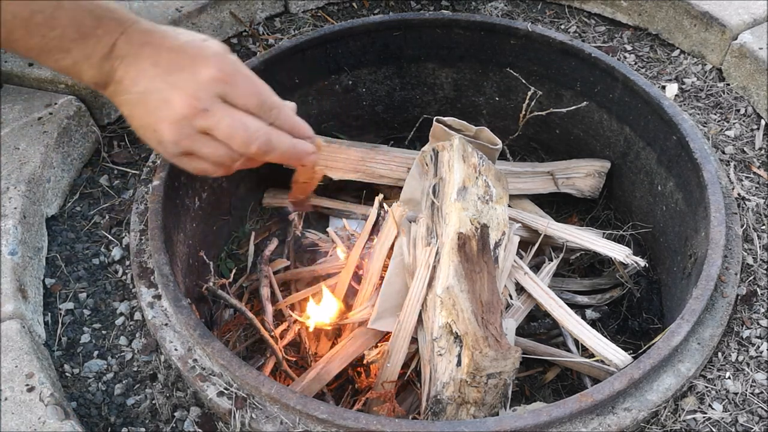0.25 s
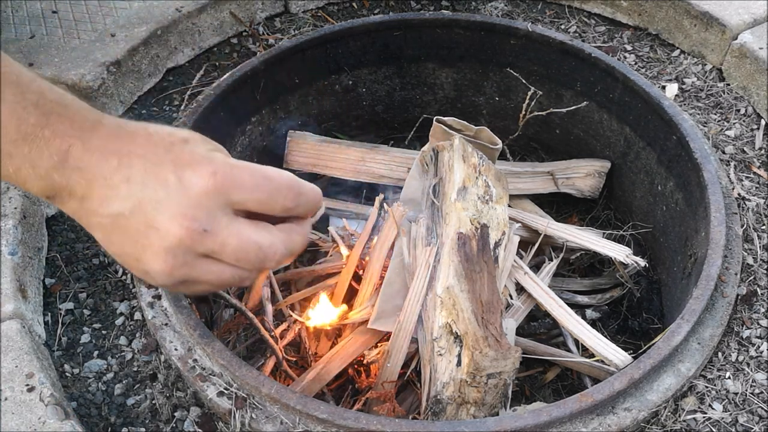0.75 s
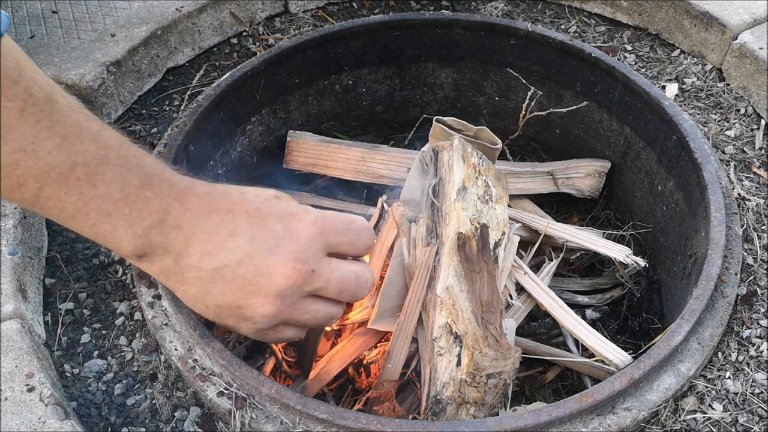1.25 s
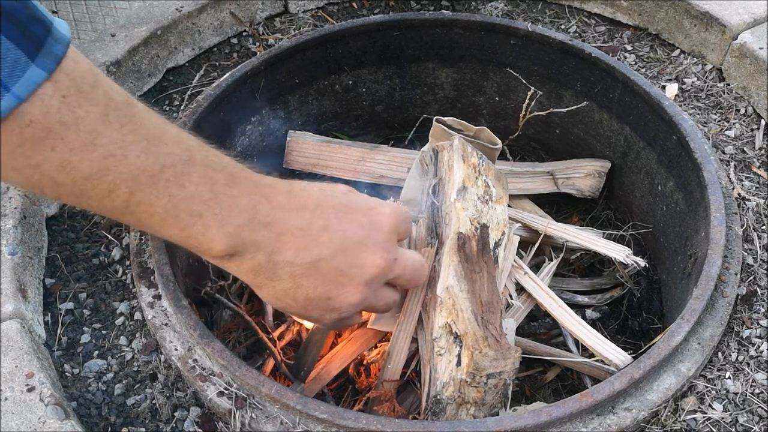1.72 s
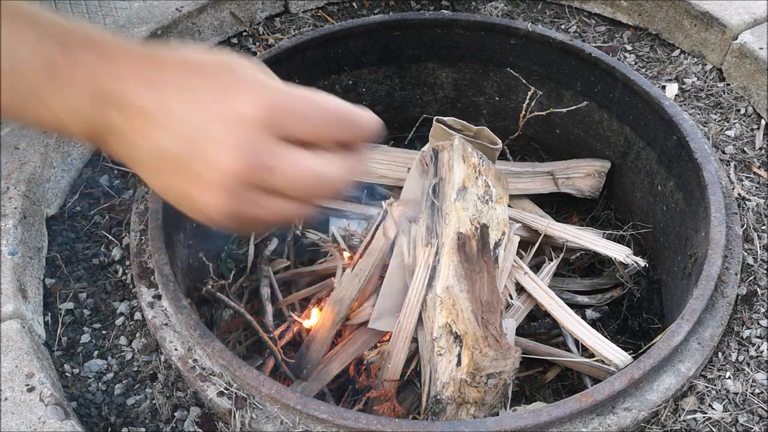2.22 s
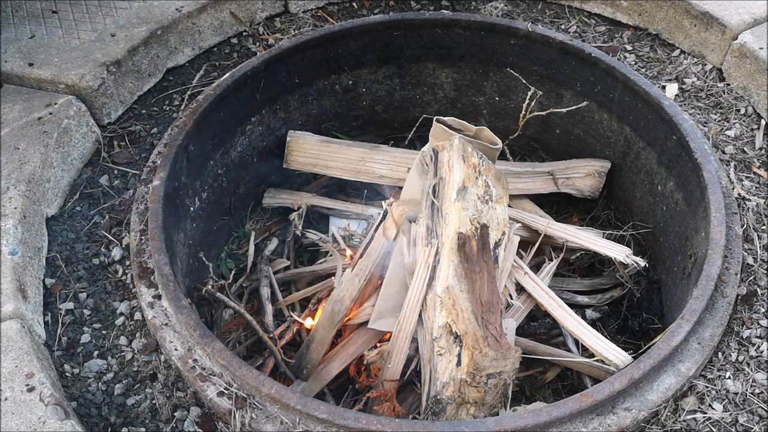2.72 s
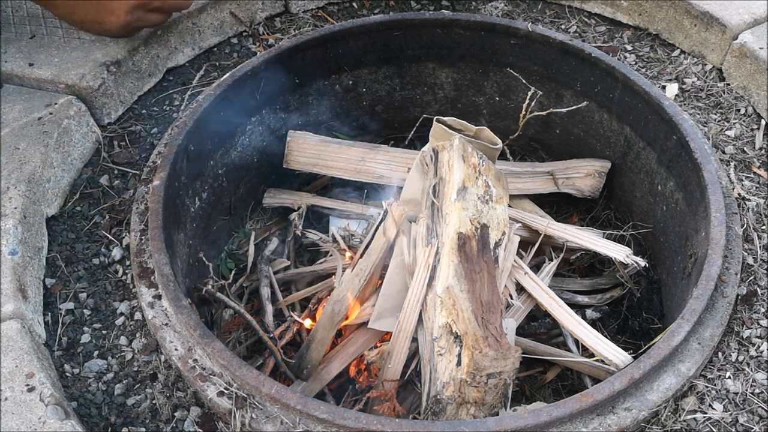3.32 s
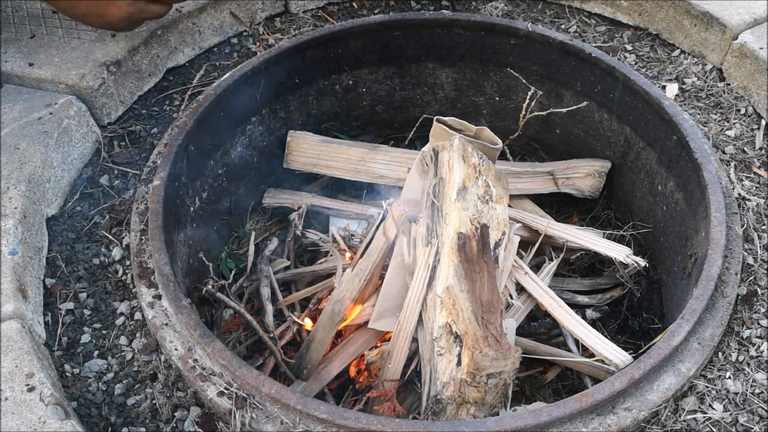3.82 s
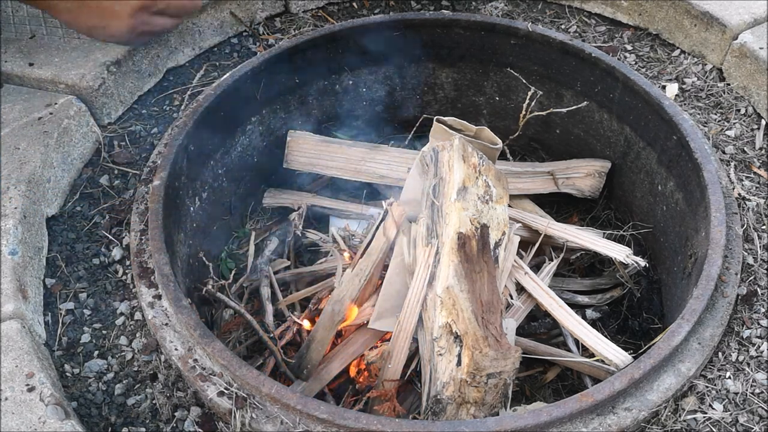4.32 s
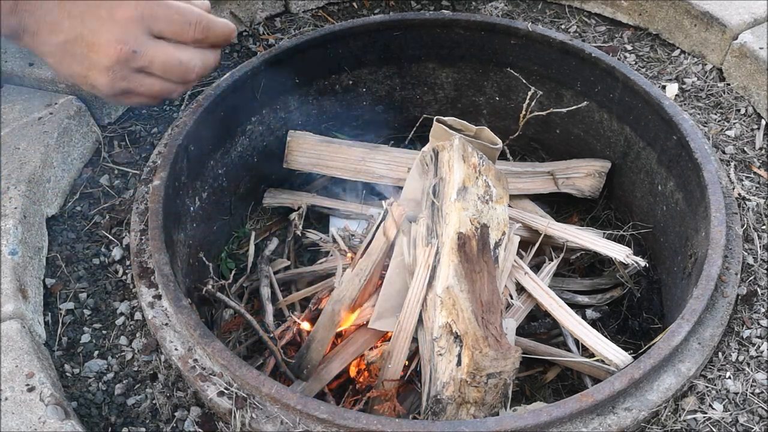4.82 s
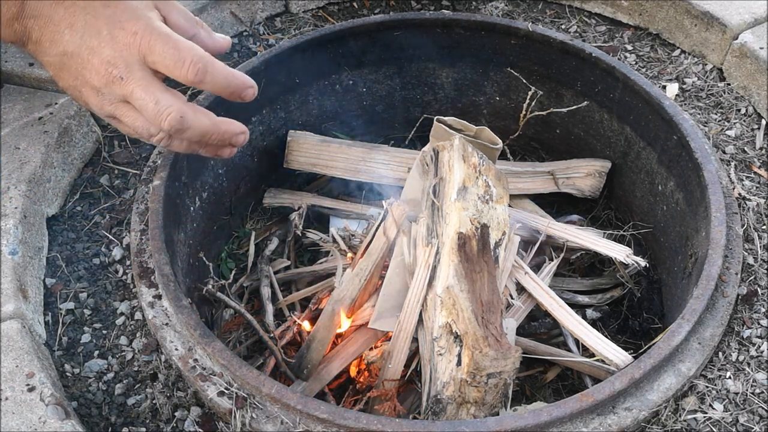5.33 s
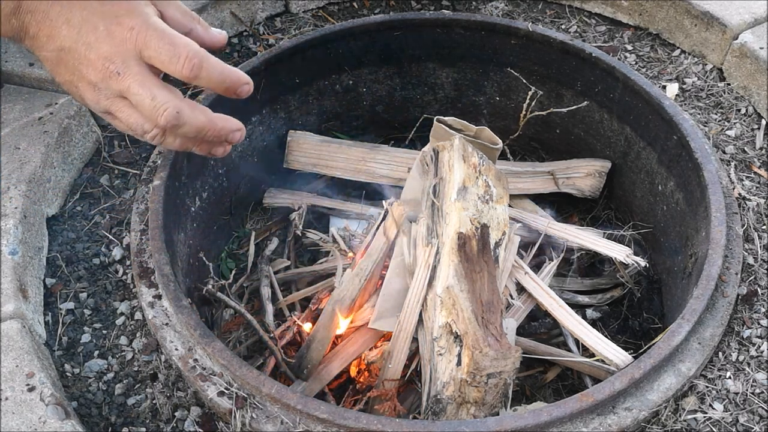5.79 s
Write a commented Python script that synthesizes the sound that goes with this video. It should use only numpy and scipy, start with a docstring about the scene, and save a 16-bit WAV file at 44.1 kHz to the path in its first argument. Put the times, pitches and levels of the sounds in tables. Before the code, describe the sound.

A hand-held phone close to a small outdoor wood fire, in quiet air with faint low wind. From 0 to 0.3 s fingers rustle dry bark and tinder, with soft thuds, tiny wood scrapes and a high, quick bird twitter at the right. Sharp, dry pops gather from 0.5 s and come thickly between 0.75 and 2.2 s over a fine ticking sizzle. Bird notes return at 1.2-1.75 s, then a strong, falling buzzy call at 1.8 s. Rustling and bumps swell again at 1.75-2.1 s. After a lull, snaps cluster around 3-3.8 s with wind puffs. Crackling thins from 4 s; a softer buzz sounds at 4.4 s. Slurred whistles and a clear chip at 4.9-5.2 s lead into sparse chips, short buzzes and isolated pops until 6 s. Faint nasal bird calls come occasionally from afar, echoing in the trees.

```python
"""Kindling and birdsong

Freshly lit kindling pops and ticks in a steel fire ring at a wooded campground: noise bursts, clicks and ringing sticks.
A hand tucks tinder into the pile, as swelling showers of clicks. Small birds twitter, buzz and whistle on gliding
tones, a nasal call made of overtones comes from far off, and decaying noise tails give the trees' echoes.
Filtered noise gives the outdoor air and the rumble on a hand-held phone, whose two ports colour sound differently."""
import sys
import numpy as np
from scipy import signal
from scipy.fft import rfft, irfft
from scipy.io import wavfile
from scipy.ndimage import uniform_filter1d

SR = 44100
rng = np.random.default_rng(int(sys.argv[2]) if len(sys.argv) > 2 else 0)


def digitize_waveform(pressure):
    """Quantize a signal to 16-bit integers and store it at the path in sys.argv[1].

    Rows of a 2-D input are taken as channels; values are limited to [-1, 1].
    """
    field = np.atleast_2d(pressure).T
    bounded = np.clip(field, -1, 1)
    quanta = np.round(bounded * 32767).astype(np.int16)
    wavfile.write(sys.argv[1], SR, quanta)


N = 267113
TIME = np.arange(N) / SR

# Colour of the left and right microphone ports. Each row: frequency in Hz, gain in dB.
LEFT_PORT_COLOUR = [(300, -24), (800, -36.5), (1050, -26), (1400, -34), (1800, -22.5), (2900, -12.5),
                    (4100, -6), (5150, 0), (6100, -13), (7200, -21), (8400, -17), (10700, -26),
                    (12500, -21), (15000, -37)]
RIGHT_PORT_COLOUR = [(300, -24), (800, -16), (1050, -25), (1400, -17), (1800, -11.5), (2900, -10.5),
                     (4100, -10), (5150, -5.5), (6100, -4.5), (7200, 6.5), (8400, -12.5), (10300, -14),
                     (12200, -7), (15000, -19.5)]
# Spectrum of the outdoor air common to both ports, then of the part with opposite sign at each.
# Each row: frequency in Hz, relative density in dB per Hz.
AIR_MID_SPECTRUM = [(26, -13), (45, -1.5), (100, -6), (170, -11.5), (290, -15.5), (430, -31), (800, -32.5),
                    (1070, -28.5), (1400, -30.5), (1840, -27), (4300, -32.5), (5400, -23), (6300, -34.5),
                    (7200, -29.5), (8240, -43), (16000, -46.5)]
AIR_SIDE_SPECTRUM = [(30, -2.5), (60, -4), (256, -5), (500, -13), (842, -14.5), (2090, -13.5), (2300, -9),
                     (3500, -18.5), (4860, -9.5), (5860, -13), (6280, -9), (7230, -21.5), (8710, -27.5),
                     (16000, -31)]
# rms levels of the two parts before the slow swell (dB)
AIR_MID_DB, AIR_SIDE_DB = -62.5, -68
# Puffs of wind on the phone. Each row: start in seconds, length in seconds, peak gain in dB.
WIND_PUFFS = [(.15, .22, -62), (.62, .08, -64), (2.02, .08, -57), (2.72, .08, -57), (3.08, .1, -51),
              (3.3, .16, -61), (4.6, .17, -50), (4.97, .2, -56), (5.5, .2, -58)]
BREEZE_DB = -64  # gain of the steady rumble beneath the puffs
# Strokes of the hand over bark and tinder.
# Each row: start in seconds, length in seconds, peak gain in dB on the port-coloured rustle.
HAND_STROKES = [(0, 0.16, -44), (.17, 0.13, -47.5), (.52, 0.087, -55), (1.22, 0.37, -54.5),
                (1.76, 0.15, -47.5), (1.93, .17, -47)]
# The sizzle's steady gain (dB), its flare relative to the pop's table snap level (dB), and the flare's decay time (s)
SIZZLE_DB, FLARE_DB, FLARE_S = -62.5, -36.5, 0.06
# Dull thuds. Each row: centre in seconds, peak level in dB, pitch in Hz.
DULL_THUDS = [(0.031, -47, 217), (0.202, -49, 237), (0.223, -44, 150), (1.068, -45.5, 153),
              (1.13, -54, 257), (1.151, -54, 198), (1.238, -54, 246), (1.488, -46, 248), (1.919, -42, 218),
              (1.954, -49, 223), (1.982, -42.5, 168), (2.024, -37, 198), (3.513, -40.5, 147),
              (3.534, -51, 254), (4.08, -42.5, 165), (4.51, -46, 160), (4.917, -49, 175), (5.1, -44, 171),
              (5.642, -48, 180)]
# Short dry scrapes of wood on wood.
# Each row: start in seconds, length in seconds, centre pitch in Hz, level in dB.
WOOD_SCRAPES = [(0.031, 0.02, 1770, -61.5), (0.087, 0.026, 2480, -58.5), (5.469, 0.065, 2370, -69.5)]
# Clear pops of the burning wood; pops() trims each band's level for the whole layer.
# Each row: start in seconds, then untrimmed levels in dB of the snap, the woody body and the top sizzle.
FIRE_POPS = [(0.0804, -46, -73, -58), (0.0856, -38.5, -61.5, -53), (0.188, -40.5, -63.5, -60),
             (0.2184, -48, -77, -53.5), (0.2588, -39, -61, -65), (0.3298, -43.5, -53.5, -63),
             (0.5147, -32.5, -55, -48.5), (0.5304, -41.5, -60, -66), (0.604, -49, -65, -59),
             (0.624, -40, -62, -58.5), (0.7474, -30.5, -61, -49.5), (0.7562, -28.5, -57.5, -44),
             (0.7698, -32, -61, -47), (0.8016, -48, -65, -62), (0.9192, -30.5, -54, -45),
             (0.9626, -33.5, -59, -50), (1.0645, -35.5, -52.5, -55), (1.1263, -26, -52, -44),
             (1.1483, -27, -51.5, -47), (1.1536, -34.5, -64, -50), (1.2372, -32.5, -54, -45.5),
             (1.2525, -35.5, -57, -50), (1.4847, -28.5, -57, -46.5), (1.514, -44, -67.5, -57),
             (1.775, -34.5, -59, -46.5), (1.7882, -44, -47.5, -47.5), (1.9727, -31, -61, -48),
             (2.043, -27.5, -49.5, -45), (2.0586, -34, -52.5, -59), (2.128, -37.5, -55, -55.5),
             (2.1651, -29.5, -50.5, -45), (2.1725, -28, -49.5, -44), (2.353, -50, -58.5, -71),
             (2.3739, -39.5, -60.5, -52.5), (2.5569, -59, -60, -64), (2.6892, -47, -79.5, -54.5),
             (2.7348, -48, -69, -63), (2.8345, -48, -54, -83), (2.9222, -36.5, -62.5, -48),
             (3.0044, -48, -70, -60.5), (3.0839, -31.5, -55.5, -42), (3.195, -41.5, -63.5, -59.5),
             (3.2339, -43, -62, -57), (3.2784, -41, -64, -54.5), (3.2919, -35.5, -59.5, -47.5),
             (3.4519, -29.5, -50, -43.5), (3.491, -30.5, -55, -41), (3.5317, -34, -59.5, -45.5),
             (3.6558, -47.5, -68, -66), (3.69, -38.5, -58, -58), (3.706, -29.5, -51.5, -48.5),
             (3.7629, -35.5, -61.5, -50), (3.804, -48, -65, -64), (3.8195, -44, -60.5, -56.5),
             (3.8386, -39, -58.5, -63), (4.0337, -45.5, -74, -63), (4.0764, -40.5, -64.5, -63),
             (4.1076, -49, -69, -65), (4.3545, -45, -62.5, -68), (4.4718, -38.5, -55, -57.5),
             (4.506, -39, -58.5, -60.5), (4.807, -43.5, -63, -59.5), (4.8574, -50, -67, -71),
             (5.0944, -34.5, -58.5, -49.5), (5.553, -44, -59, -67), (5.6433, -44, -62, -54.5),
             (5.9715, -48, -72, -66)]
# Ringing of the sticks before each pop scatters pitch and level.
# Each row: frequency in Hz, relative level in dB, time to fall by 60 dB in seconds.
STICK_MODES = [(310, -1, .028), (590, -9, .022), (1080, -7, .022), (1780, 4, .02), (2650, -3, .01),
               (3500, -7, .008)]
# The fire lies to the right: a pop's treble, left minus right, and its scatter from pop to pop (dB)
FIRE_PAN_DB, FIRE_SCATTER_DB = -6, 1.5
# The near bird's twitter. Each row: start in seconds, length in seconds, mid-note pitch in Hz, level in dB.
TWITTER_NOTES = [(0.102, 0.046, 6100, -55), (0.164, 0.034, 5980, -52.5), (0.201, 0.041, 6220, -49),
                 (0.273, 0.02, 6170, -46.5), (0.315, 0.032, 5950, -50.5), (0.947, 0.025, 5430, -54.5),
                 (1.044, .033, 5520, -57), (1.215, 0.021, 6070, -47.5), (1.276, 0.017, 6060, -46),
                 (1.336, 0.015, 6070, -47.5), (1.389, 0.022, 6160, -39), (1.456, 0.023, 5890, -48),
                 (1.526, .023, 5430, -52), (1.609, .021, 5800, -47), (1.647, 0.015, 6320, -40),
                 (1.723, 0.013, 5530, -52.5), (1.753, 0.014, 6270, -39), (2.464, 0.0088, 6070, -52.5)]
# The loudest note starts and ends this far below its pitch (Hz); the bird sits right (left minus right, dB)
TWITTER_RISE_HZ, TWITTER_DROP_HZ, TWITTER_PAN_DB = 550, 603, -38
# Far nasal calls. Each row: start in seconds, length in seconds, highest pitch of the arch in Hz,
# level in dB before the layer trim.
FAR_CALLS = [(0.477, 0.27, 464, -75), (1.588, 0.14, 529, -65.5), (2.34, 0.14, 475, -72),
             (4.836, 0.14, 517, -72.5), (5.441, 0.16, 491, -76), (5.958, 0.096, 523, -68)]
# Their overtones. Each row: multiple of the pitch, relative level in dB.
CALL_OVERTONES = [(3, -15.5), (4, -3), (5, -6), (6, -14.5)]
# Straight slurred whistles. Each row: start in seconds, length in seconds, starting pitch in Hz,
# ending pitch in Hz, level in dB, left minus right in dB.
SLURRED_WHISTLES = [(1.32, 0.025, 5900, 4540, -56.5, 17), (1.45, 0.026, 4600, 5600, -57, 4.5),
                    (1.517, 0.026, 5080, 4490, -59.5, 3), (3.533, 0.16, 5820, 5980, -63.5, -16),
                    (4.92, .06, 5950, 4970, -65.5, 4), (4.965, .075, 5770, 5680, -64, -14),
                    (5.117, 0.083, 6380, 4980, -56, -10)]
# Short arched chips from the trees.
# Each row: start in seconds, mid-note pitch in Hz, level in dB, left minus right in dB.
TREE_CHIPS = [(1.436, 5010, -52, 28), (1.457, 4470, -55, 15), (2.418, 4990, -63, 9),
              (5.215, 5056, -45.5, 9), (5.388, 4570, -65, 4), (5.563, 4500, -70, 0), (5.79, 4700, -71, 9),
              (5.997, 4630, -62.5, -3)]
CHIP_S, CHIP_ARCH_HZ = 0.024, 472  # length, and how far every chip rises and then drops
# Buzzy calls. Each row: start in seconds, length in seconds, starting pitch in Hz before the trill,
# level in dB, left minus right in dB.
BUZZY_CALLS = [(1.813, .12, 6665, -24.5, -20), (4.371, 0.12, 6500, -42, -14), (5.08, .03, 6830, -50, -7),
               (5.106, 0.074, 7330, -53, -22), (5.298, 0.024, 6100, -52, 5), (5.469, .03, 5720, -52, 1),
               (5.683, 0.028, 6400, -54, 1), (5.894, 0.027, 6300, -54.5, 2)]
# Fall below the starting pitch at the middle and the end (Hz); the envelope peaks after this share of the length
BUZZ_MID_FALL_HZ, BUZZ_END_FALL_HZ, BUZZ_PEAK_SHARE = 228, 1235, 0.18
TOP_HZ = 15800  # where the phone cuts the very top


def undb(db):
    """Decibels to gain."""
    return 10 ** (np.asarray(db) / 20)


def unit(x):
    """Scale each channel to rms 1."""
    return x / np.sqrt(np.mean(x ** 2, axis=-1, keepdims=True))


def band(x, lo_hz, hi_hz, order=3):
    """Band-pass filter."""
    return signal.sosfilt(signal.butter(order, [lo_hz, hi_hz], "band", fs=SR, output="sos"), x)


def colour(x, points, size=4096):
    """Causal minimum-phase filter through (Hz, dB) points."""
    hz, db = np.transpose(points)
    bins_hz = np.arange(size // 2 + 1) * SR / size
    gain = undb(np.interp(np.log(bins_hz + 1), np.log(hz), db))
    # folding the cepstrum forward in time makes the filter causal
    cepstrum = irfft(np.log(gain))[:size // 2]
    cepstrum[1:] *= 2
    impulse = irfft(np.exp(rfft(cepstrum, size)))
    return signal.fftconvolve(x, impulse)[:len(x)]


def ports(pair):
    """Each microphone port adds its own resonances."""
    return np.array([colour(pair[0], LEFT_PORT_COLOUR), colour(pair[1], RIGHT_PORT_COLOUR)])


def add(out, s, sound):
    """Mix a sound in at time s."""
    start = max(int(s * SR), 0)
    out[:, start:start + sound.shape[1]] += sound[:, :N - start]


def placed(db, pan_db):
    """Left and right gains for a total level and a left minus right difference."""
    sides = undb(np.array([[pan_db], [-pan_db]]) / 2)
    return undb(db) * sides / np.linalg.norm(sides)


def swells(rows):
    """Gain that rises and falls once for each (s, length s, dB) row."""
    return sum(undb(db) * np.sin(np.pi * np.clip((TIME - s) / length, 0, 1)) for s, length, db in rows)


def walk(per_s):
    """Smoothed random wander of rms 1, with per_s fresh steps a second."""
    hold = int(SR / per_s)
    steps = np.repeat(rng.standard_normal(N // hold + 1), hold)
    smooth = uniform_filter1d(uniform_filter1d(steps, hold), hold)
    return unit(smooth[:N])


def arch(u, start, middle, end):
    """Smooth pitch arch over a note's progress u."""
    return start + (end - start) * u + (2 * middle - start - end) * 2 * u * (1 - u)


def echoes(x, wet_db, t60_s, delay_s):
    """Scattered reflections, different at each port, as sparse noise that dies away."""
    t = TIME[:SR]
    decay = np.exp(-np.log(1000) * t / t60_s)
    # cubing the noise leaves a few strong reflections among many weak ones
    reflections = rng.standard_normal((2, SR)) ** 3 * (t > delay_s) * decay
    tail = unit(reflections) / np.sqrt(SR)
    return undb(wet_db) * signal.fftconvolve(x, tail, axes=1)[:, :N]


def ticks(per_s, spread_db, ring_s):
    """A shower of tiny clicks, most of them faint, each its own short burst of noise."""
    sizes = undb(spread_db * np.minimum(rng.exponential(size=N), 2))
    hits = (rng.random(N) < per_s / SR) * sizes
    decay = np.exp(-TIME[:SR // 50] / ring_s)
    envelope = signal.fftconvolve(hits, decay)[:N]
    return unit(envelope * rng.standard_normal((2, N)))


def air(swell_db=1.0, flutter_db=3, draught_db=-69, hiss_db=-76):
    """Outdoor hush that swells slightly, the low flutter and thin hiss of the flames, and light wind underneath."""
    mid = unit(colour(rng.standard_normal(N), AIR_MID_SPECTRUM)) * undb(AIR_MID_DB)
    side = unit(colour(rng.standard_normal(N), AIR_SIDE_SPECTRUM)) * undb(AIR_SIDE_DB)
    hush = (mid + np.array([side, -side])) * undb(swell_db * walk(3.744))
    flames = unit(band(rng.standard_normal(N), 59, 125)) * undb(draught_db + flutter_db * walk(7.4))
    hiss = unit(band(rng.standard_normal((2, N)), 5400, 7740)) * undb(hiss_db + 2 * walk(5.6))
    rumble = unit(band(rng.standard_normal(N), 14, 37.9)) * (undb(BREEZE_DB) + swells(WIND_PUFFS))
    return hush + flames + hiss + rumble


def sizzle(per_s=45, spread_db=6):
    """Tiny ticks from burning paper and bark; they flare up briefly after a pop, more after a loud one."""
    crackle = ticks(per_s, spread_db, ring_s=0.0016)
    flare = np.zeros(N)
    for s, snap, *_ in FIRE_POPS:
        start = int(s * SR)
        dying = undb(snap + FLARE_DB) * np.exp(-TIME[:N - start] / FLARE_S)
        flare[start:] = np.maximum(flare[start:], dying)
    return ports(crackle) * (undb(SIZZLE_DB) + flare)


def rustle(body_db=-13, left_db=-5):
    """Dry fibres catch and slip under the fingers; the sticks give it some body."""
    grains = ticks(per_s=1000, spread_db=5, ring_s=0.0005)
    fibres = ports(grains) * undb([[left_db], [0]])
    body = undb(body_db) * band(grains, 200, 3900, order=1)
    return (fibres + body) * swells(HAND_STROKES)


def thuds(width_s=0.0026):
    """Soft bumps of about a cycle: a cosine under a bell-shaped envelope."""
    out = np.zeros((2, N))
    t = TIME[:SR // 25] - 1 / 50
    bell = np.exp(-(t / width_s) ** 2)
    for s, db, hz in DULL_THUDS:
        bump = -undb(db) * np.cos(2 * np.pi * hz * t) * bell
        add(out, s + t[0], bump[None])
    return out


def scrapes(width=0.24):
    """A stick slips over another in a burst of tiny catches, band-passed around its pitch."""
    out = np.zeros((2, N))
    catches = ticks(per_s=500, spread_db=3, ring_s=0.001)
    for s, length, hz, db in WOOD_SCRAPES:
        size = int(length * SR)
        piece = catches[:, int(s * SR):][:, :size]
        sound = band(piece, hz * (1 - width), hz * (1 + width), order=2)
        add(out, s, unit(sound * np.hanning(size)) * undb(db))
    return out


def wood_ring(t, stretch=0.025, spot_db=4, rise_s=0.00015):
    """Decaying stick modes: every stick has its own length (pitch) and is struck at its own spot (level)."""
    ring = 0
    for (hz, db, t60), (spot, shift) in zip(STICK_MODES, rng.standard_normal((len(STICK_MODES), 2))):
        tone = np.sin(2 * np.pi * hz * np.exp(stretch * shift) * t)
        decay = np.exp(-np.log(1000) * t / t60)
        ring = ring + undb(db + spot_db * spot) * tone * decay
    return ring * (1 - np.exp(-t / rise_s))


def pops(snap_db=-2.5, body_db=6.5, top_db=7, crack=3, burst_s=0.0017, wall_s=0.0036,
         wall_spread_s=0.00089, wall_db=-13, tail_s=0.023, tail_db=-27, wood_db=-27, shared=0.52, size=2048):
    """A fibre bursts: a sharp crack, scatter among the sticks, a slap from the steel wall, a short woody ring."""
    out, t = np.zeros((2, N)), TIME[:size]
    slap = undb(wall_db) * np.exp(-((t - wall_s) / wall_spread_s) ** 2)
    scatter = np.exp(-t / burst_s) + slap + undb(tail_db) * np.exp(-t / tail_s)
    for s, snap, body, top in FIRE_POPS:
        noise = rng.standard_normal((3, size))
        # part of the noise is the same at both ports
        burst = (np.sqrt(1 - shared) * noise[:2] + np.sqrt(shared) * noise[2]) * scatter
        burst[:, 0] += crack
        # the sound reaches the left port four samples later
        burst[0] = np.pad(burst[0], (4, 0))[:size]
        burst = ports(burst) + undb(wood_db) * wood_ring(t)
        # the phone's body shades only the treble
        sides = placed(0, FIRE_PAN_DB + FIRE_SCATTER_DB * rng.standard_normal())
        bands = [(250, 4200, body + body_db, 1),
                 (4200, 8500, snap + snap_db, sides),
                 (8500, 17000, top + top_db, sides)]
        for lo_hz, hi_hz, db, gain in bands:
            part = band(burst, lo_hz, hi_hz) * gain
            # the level is that of the loudest 2 ms
            peak = np.sqrt(uniform_filter1d(np.mean(part ** 2, axis=0), size=88).max())
            add(out, s, part * undb(db) / peak)
    return out


def note(length, start, middle, end, overtone_db=-60, waver=0.0056):
    """A nearly pure gliding note whose pitch wavers a little, with an octave overtone."""
    u = np.linspace(0, 1, int(length * SR))
    wander = 1 + waver * unit(band(rng.standard_normal(len(u)), 80, 600))
    phase = 2 * np.pi * np.cumsum(arch(u, start, middle, end) * wander) / SR
    tone = np.sin(phase) + undb(overtone_db) * np.sin(2 * phase)
    return unit(np.sin(np.pi * u) ** 0.86 * tone)


def twitter(overtone_db=-11):
    """The near bird repeats one small arched note from one perch; the louder the note, the higher its arch."""
    out = np.zeros((2, N))
    loudest_db = max(row[3] for row in TWITTER_NOTES)
    for s, length, hz, db in TWITTER_NOTES:
        effort = undb(0.27 * (db - loudest_db))
        start, end = hz - TWITTER_RISE_HZ * effort, hz - TWITTER_DROP_HZ * effort
        tone = note(length, start, hz, end, overtone_db)
        add(out, s, tone * placed(db, TWITTER_PAN_DB))
    return out


def nasal_calls(gain_db=-3):
    """A far bird's nasal note: only the middle overtones of an arched, slightly hoarse pitch carry."""
    out = np.zeros((2, N))
    for s, length, hz, db in FAR_CALLS:
        u = np.linspace(0, 1, int(length * SR))
        hoarse = 1 + 0.02 * unit(band(rng.standard_normal(len(u)), 30, 200))
        pitch = hz * arch(u, 0.87, 1, 0.87) * hoarse
        phase = 2 * np.pi * np.cumsum(pitch) / SR
        tone = sum(undb(part_db) * np.sin(k * phase) for k, part_db in CALL_OVERTONES)
        add(out, s, undb(db + gain_db) * unit(tone * np.sin(np.pi * u))[None])
    return out + echoes(out, wet_db=-1.5, t60_s=0.61, delay_s=0.011)


def whistles():
    """Birds in the trees chip on arched tones and slur on straight glides."""
    out = np.zeros((2, N))
    for s, hz, db, pan in TREE_CHIPS:
        chip = note(CHIP_S, hz - CHIP_ARCH_HZ, hz, hz - CHIP_ARCH_HZ)
        add(out, s, chip * placed(db, pan))
    for s, length, start, end, db, pan in SLURRED_WHISTLES:
        slur = note(length, start, (start + end) / 2, end, waver=0.022)
        add(out, s, slur * placed(db, pan))
    return out


def buzzes(trill_hz=135, swing_hz=680, throb=0.3, second_db=-6, overtone_db=-22):
    """A falling whistle swept rapidly up and down; the other side of the syrinx joins in lower."""
    out = np.zeros((2, N))
    for s, length, start, db, pan in BUZZY_CALLS:
        u = np.linspace(0, 1, int(length * SR))
        # the trill rate drifts irregularly
        wobble = np.interp(u, np.linspace(0, 1, 12), rng.standard_normal(12))
        trill = np.sin(2 * np.pi * np.cumsum(trill_hz * (1 + 0.059 * wobble)) / SR)
        fall = arch(u, start, start - BUZZ_MID_FALL_HZ, start - BUZZ_END_FALL_HZ)
        hz = fall + 120 * unit(band(rng.standard_normal(len(u)), 100, 900))
        # the lower voice swings less, and the opposite way
        upper = 2 * np.pi * np.cumsum(hz + swing_hz * trill) / SR
        lower = 2 * np.pi * np.cumsum(hz - 250 - swing_hz * 0.34 * trill) / SR
        first = (np.sin(upper) + undb(overtone_db) * np.sin(2 * upper)) * (1 + throb * trill)
        second = np.sin(lower) + undb(overtone_db) * np.sin(upper + lower)
        tone = first + undb(second_db) * np.minimum(2 * u, 1) * second
        tone = tone * np.interp(u, [0, BUZZ_PEAK_SHARE, 0.95, 1], [0, 1, 0.35, 0])
        add(out, s, unit(ports([tone, tone])) * placed(db, pan))
    return out


def scene():
    """Fire in front, birds around it, trees behind them."""
    fire = sizzle() + thuds() + pops()
    hand = rustle() + scrapes()
    birds = twitter() + whistles() + buzzes()
    ground = echoes(birds, wet_db=-8, t60_s=0.073, delay_s=0.00056)
    trees = echoes(birds.mean(axis=0, keepdims=True), wet_db=-8.5, t60_s=0.48, delay_s=0.017)
    return air() + fire + hand + birds + ground + trees + nasal_calls()


def record(dry):
    """The phone cuts the very top with a steep low-pass."""
    return signal.sosfilt(signal.ellip(8, 0.2, 70, TOP_HZ, fs=SR, output="sos"), dry)


dry = scene()
out = record(dry)
digitize_waveform(out)
```